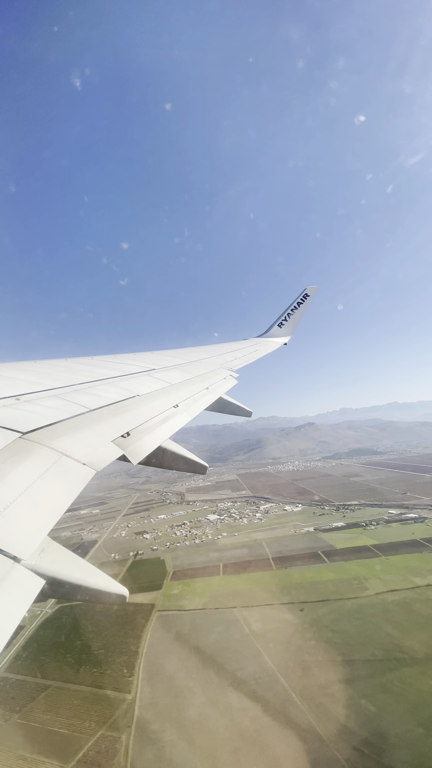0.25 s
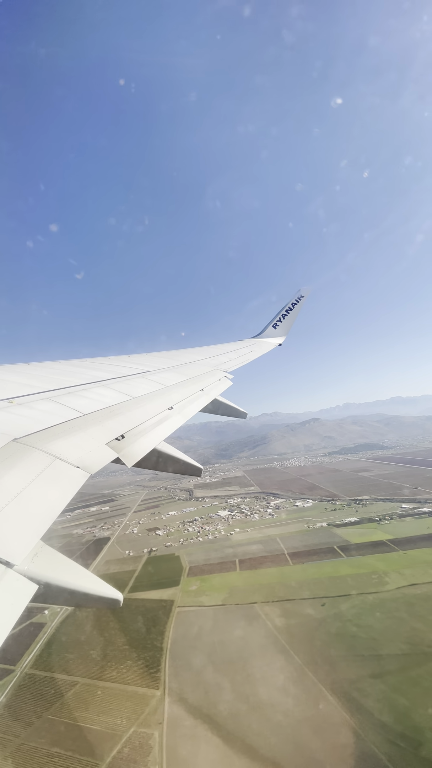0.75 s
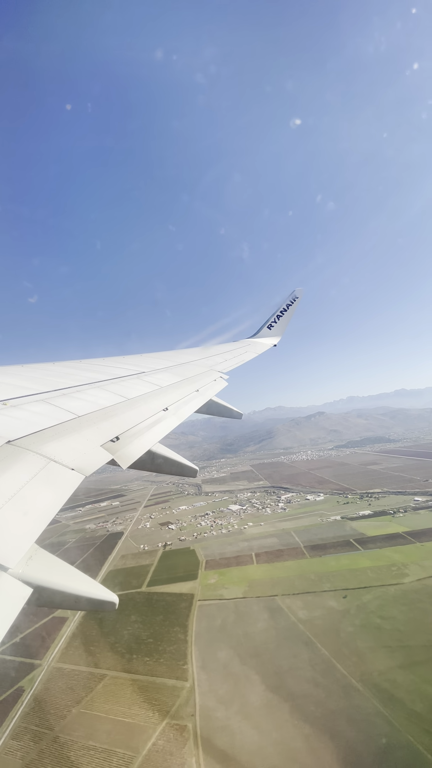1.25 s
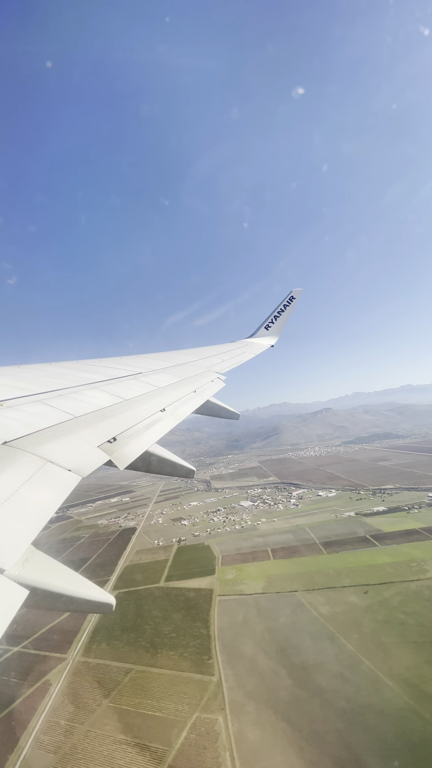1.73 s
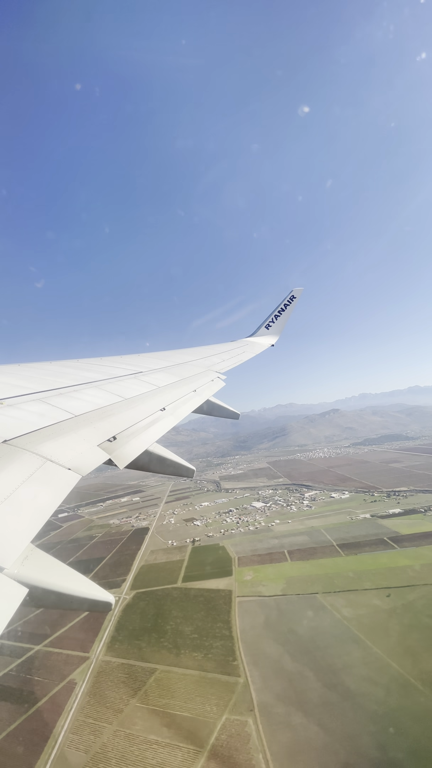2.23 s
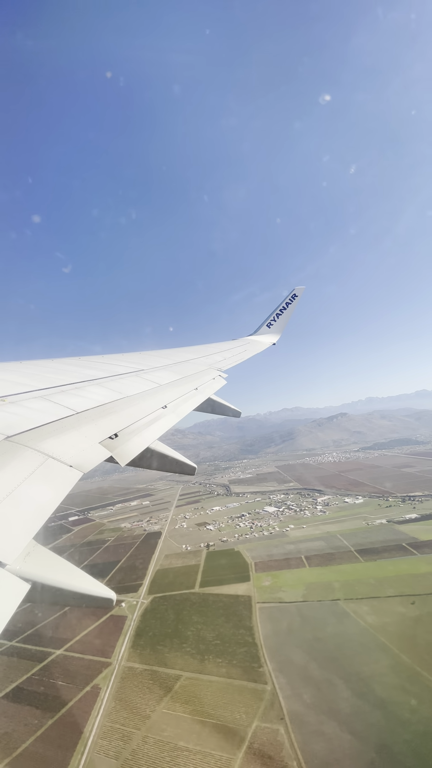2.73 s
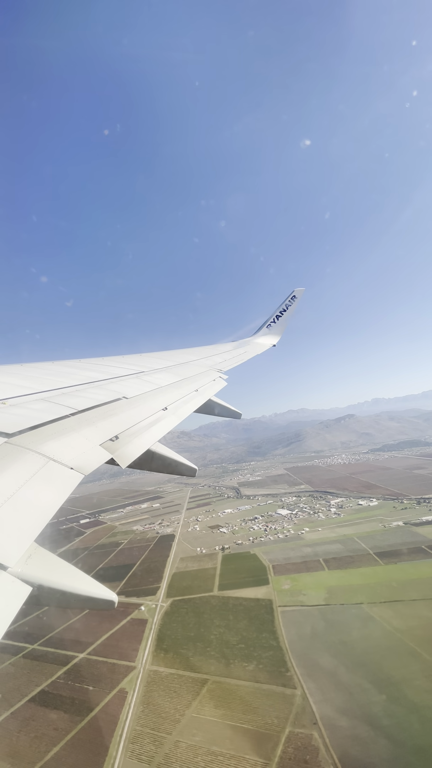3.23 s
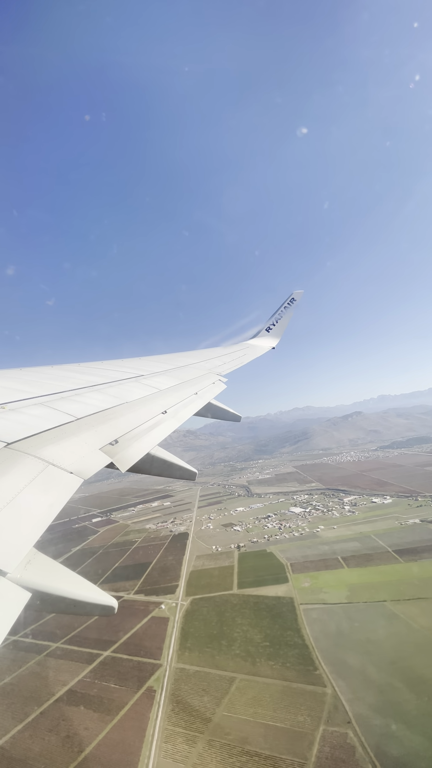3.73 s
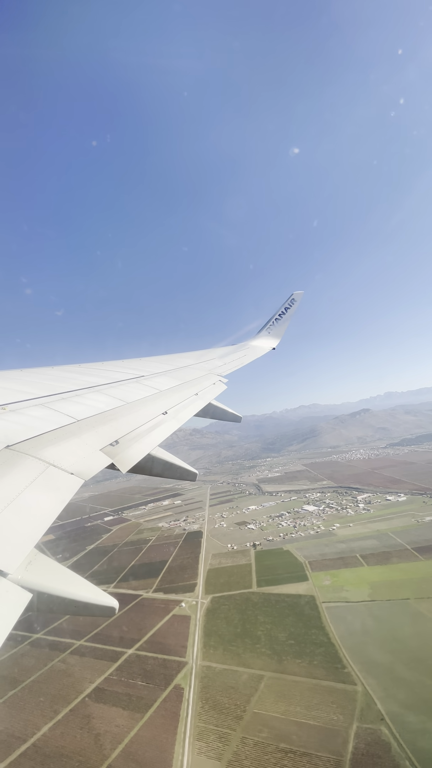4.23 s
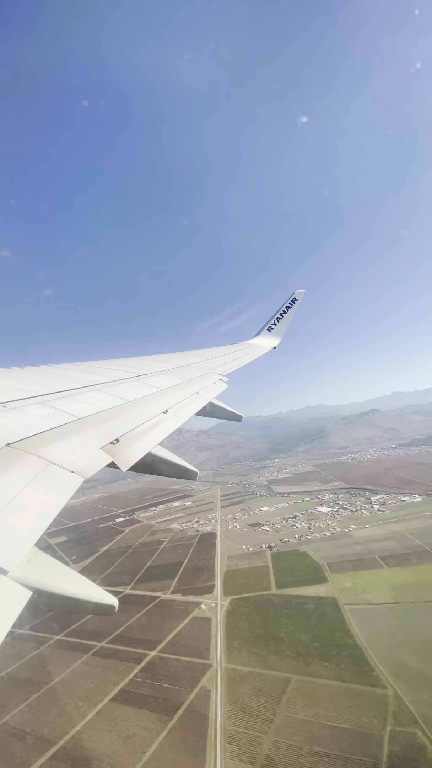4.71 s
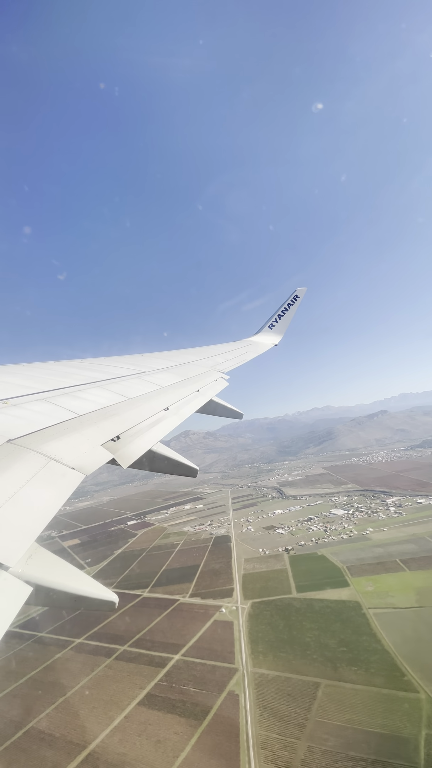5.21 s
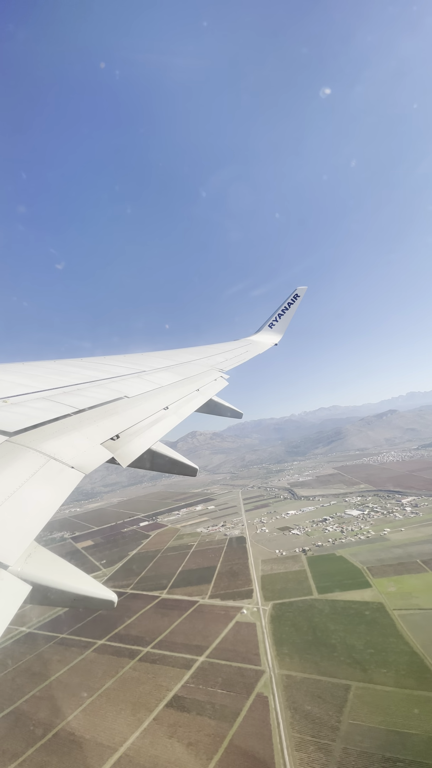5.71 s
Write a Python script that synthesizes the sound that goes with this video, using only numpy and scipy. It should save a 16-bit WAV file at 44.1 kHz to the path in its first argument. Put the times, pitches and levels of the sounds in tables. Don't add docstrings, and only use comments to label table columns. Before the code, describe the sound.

Continuous deep jet rumble heard from a window seat behind the wing, close and enclosed. Exhaust booms through the wall with a low pulsing shaft drone, and thin air hiss lies above. Small plastic trim ticks and short creaks scatter throughout, densest in the first few seconds. A very faint pump whine joins near the end. A handheld phone picks it all up in stereo, bass heavy and slightly compressed.

```python
import sys
import numpy as np
from scipy import signal
from scipy.fft import rfft, irfft, next_fast_len
from scipy.io import wavfile
from scipy.ndimage import uniform_filter1d, minimum_filter1d

SR = 44100
rng = np.random.default_rng(int(sys.argv[2]) if len(sys.argv) > 2 else 0)


def gain_from_db(level_db):
    decades = np.asarray(level_db, float) / 20
    return 10 ** decades


def inscribe(sig):
    pcm = np.round(np.clip(np.atleast_2d(sig).T, -1, 1) * 32767)
    wavfile.write(sys.argv[1], SR, pcm.astype(np.int16))


N = 262836
SIZE = next_fast_len(N)
HZ = np.maximum(np.arange(SIZE // 2 + 1) * SR / SIZE, 1)
TIME = np.arange(N) / SR


def over_hz(table):
    hz, *columns = np.transpose(table)
    return [np.interp(np.log(HZ), np.log(hz), column) for column in columns]


def shape(x, gain):
    return irfft(rfft(x, SIZE) * gain, SIZE)[..., :N]


def share(lo_hz, hi_hz):
    return 1 / (1 + (lo_hz / HZ) ** 6) - 1 / (1 + (hi_hz / HZ) ** 6)


def walk(rate):
    k = int(SR / rate)
    steps = np.repeat(rng.standard_normal(N // k + 1), k)
    return 1.388 * uniform_filter1d(uniform_filter1d(steps, k), k)[:N]


def swells(table):
    return sum(db * np.exp(-((TIME - s) / length) ** 2) for s, db, length in table)


# f/Hz, width/Hz, level/dB
PANE_RINGS = [(1077, 83, -50.5), (2093, 50, -63.5)]


def pane():
    noise = rng.standard_normal(N)
    out = 0
    for hz, width, db in PANE_RINGS:
        ring = shape(noise, 1 / np.sqrt(1 + (2 * (HZ - hz) / width) ** 4))
        out = out + gain_from_db(db) * ring / ring.std()
    return out


# t/s, f/Hz, level/dB
PUMP_WHINE = [
    (5.08, 1834, -60),
    (5.2, 1840, -59),
    (5.96, 1862, -61),
]


def pump():
    s, hz, db = np.transpose(PUMP_WHINE)
    start = np.clip((TIME - s[0]) / .03, 0, 1)
    phase = 2 * np.pi * np.cumsum(np.interp(TIME, s, hz)) / SR
    return np.sqrt(2) * start * gain_from_db(np.interp(TIME, s, db)) * np.sin(phase)


# f/Hz, level/dB
SQUEAK_NOTES = [(11000, -39), (8200, -50), (2200, -50)]


def squeak():
    middle_s, length_ms = .175, 7
    swell = np.exp(-((TIME - middle_s) * 1000 / length_ms) ** 2)
    return swell * sum(gain_from_db(db) * np.sin(2 * np.pi * hz * TIME) for hz, db in SQUEAK_NOTES)


# t/s, level/dB, dull part level/dB, bright part level/dB
TRIM_TICKS = [(0.0538, -64.5, -6, 11), (0.168, -63, 12, 18.5), (0.2101, -54, 13, 11),
              (0.2192, -53, 16, 17.5), (0.4448, -54, -4, 11.5), (0.5735, -53, 0, 5),
              (0.844, -39, -12, -8.5), (1.0428, -48, 0, 4.5), (1.0806, -54, 3, 0), (1.2367, -51, -12, 2),
              (1.3503, -52.5, 7, 6.5), (1.8203, -57.5, 4, 3.5), (1.8864, -42, 2, 2), (1.9752, -54, -1, 3),
              (2.0803, -47, 1, 5), (2.1272, -55.5, 2, 7), (2.2504, -55.5, 3, 5), (2.5237, -53, 2, 5),
              (2.6196, -45.5, -8, 0), (2.6526, -55, 1, 11.5), (2.9314, -46.5, -1, 5),
              (3.1505, -46.5, -2, 5), (3.1997, -53.5, 3, 0.5), (3.3473, -52.5, -5, 2.5),
              (3.8996, -43, -2, 1), (4.2398, -51.5, -12, -2.5), (5.0765, -49, -2, 7.5),
              (5.4244, -43, -7, 4), (5.6317, -50, -6, 11)]
# start t/s, length t/s, level/dB, slip rate f/Hz, bright part level/dB
TRIM_CREAKS = [
    (0.181, .03, -63.5, 130, 15.5),
    (0.226, .03, -62.5, 110, 10),
    (0.465, .075, -56.5, 68, 5),
    (0.734, .025, -52, 65, 3.5),
    (1.4164, .035, -53, 40, -1),
    (1.563, .042, -50, 65, -4.5),
    (3.731, .055, -53, 39, 0.5),
    (4.011, .025, -52, 60, -5),
    (4.113, .037, -54, 95, 2),
    (4.35, .052, -51.5, 86, 0.5),
]
# f/Hz, level/dB
TRIM_COLOUR = [(1300, -22), (2000, 4), (3400, -2), (4800, -5.5), (5350, 0), (5900, -5), (6600, -3.5),
               (8100, 2.5), (9300, -0.5), (10800, 7.5), (12000, -10.5), (13500, -22)]


def trim_slips():
    rows = list(TRIM_TICKS)
    for at, u in rng.random((160, 2)):
        rows.append((at * N / SR, -64 - 5 * np.log10(u + .01), -3, -2.5))
    scatters = rng.standard_normal((len(TRIM_CREAKS), 12))
    for (start, length, db, rate, bright_db), scatter in zip(TRIM_CREAKS, scatters):
        for s, z in zip(np.arange(start, start + length, 1 / rate), scatter):
            rows.append((s, db + z, -3, bright_db))
    return rows


def trim():
    slip_ms, rise_ms, ring_ms = 4.54, 0.29, 26
    ms = np.arange(3000) / SR * 1000
    power = np.zeros((3, N + len(ms)))
    for s, db, dull_db, bright_db in trim_slips():
        ring_db = -10 - 0.28 * (db + 54.5)
        ring = gain_from_db(ring_db) * np.exp(-ms / ring_ms)
        burst = (1 - np.exp(-ms / rise_ms)) * (np.exp(-(ms / slip_ms) ** 4) + 1.66 * ring)
        band_db = db + np.array([[dull_db], [0], [bright_db]])
        i = int(s * SR)
        power[:, i:i + len(ms)] += (gain_from_db(band_db) * burst) ** 2

    jumps = gain_from_db(0.99 * rng.standard_normal(N // 20 + 1).repeat(20)[:N])
    grit = shape(rng.standard_normal((2, N)) * jumps, gain_from_db(over_hz(TRIM_COLOUR)[0]))
    edges = [0, 4100, 7000, SR * 20]
    out = 0
    for lo, hi, p in zip(edges, edges[1:], power):
        band = shape(grit, share(lo, hi))
        even = band / np.sqrt(uniform_filter1d(band ** 2, size=130, axis=1))
        out = out + even * np.sqrt(p[:N])
    return shape(out, share(1100, 12000))


ENGINE_HZ = [74.2, 1049, 1482.6, 2056, 4230.6]
# level/dB, pitch wander f/Hz, wander level/dB, left minus right level/dB, right leads phase/rad
ENGINE_TONES = [
    (-19.5, 0.61, 1.6, -1.2, 0.07),
    (-53.5, 1.5, -1, -4.5, 0.27),
    (-59.5, 2.2, 3.5, 6, -1.8),
    (-68.5, 2.5, 3, -1, 1.6),
    (-66.5, 0.24, -0.5, -2, -1.3),
]
# t/s, lift level/dB, length t/s
SHAFT_BEATS = [
    (0.22, -2.5, .15),
    (0.65, 6.5, 0.82),
    (3.18, 7, 0.52),
    (4.02, 5.5, 0.079),
    (4.9, 2.5, 0.67),
]
# t/s, lift level/dB, length t/s
GEAR_BEATS = [
    (0.55, 3, .25),
    (2.0, 0, .2),
    (2.78, 6, .15),
    (3.8, 6.5, .4),
    (4.39, -6.5, .1),
    (4.65, 2.5, .2),
]
# t/s, lift level/dB, length t/s
BLADE_BEATS = [
    (0.28, -14, 0.11),
    (2.45, 4.5, 0.23),
    (4.0, 9.5, 0.21),
]


def tones():
    beats = [swells(SHAFT_BEATS) - 2, swells(GEAR_BEATS) - 2, swells(BLADE_BEATS) - 1, 0, 0]
    side = np.array([[1], [-1]]) / 2
    out = 0
    for hz, tone, beat_db in zip(ENGINE_HZ, ENGINE_TONES, beats):
        db, wander_hz, wander_db, pan_db, lead = tone
        phase = 2 * np.pi * np.cumsum(hz + wander_hz * walk(5.4)) / SR
        level_db = db + beat_db + wander_db * walk(5.93)
        out = out + np.sqrt(2) * gain_from_db(level_db + pan_db * side) * np.sin(phase - lead * side)
    return out


# f/Hz, level/dB (per Hz)
EXHAUST = [(20, -58), (38, -43), (52, -35), (64, -35), (88, -36.5), (135, -34), (165, -34.5), (225, -35.5),
           (250, -45.5), (330, -42), (375, -51.5), (410, -48), (460, -58.5), (560, -61.5)]
# f/Hz, level/dB (per Hz)
RUSHING_AIR = [(560, -62.5), (750, -61), (1000, -70), (1400, -70.5), (1800, -82), (2150, -80), (2900, -83),
               (3600, -90), (5000, -93.5), (7000, -94), (8300, -96.5), (9700, -95.5), (11000, -97.5),
               (12300, -107.3)]
# f/Hz, width/Hz, lift level/dB
CABIN_BOOMS = [(111, 13, 9), (196.6, 7.4, -1.5), (235, 33, 2), (5160, 120, 4), (10600, 270, 2)]
# t/s, drone level/dB, length t/s
EXHAUST_BUFFETS = [(0.32, 6, 0.16), (1.38, -5.5, 0.26), (1.58, 8, 0.041), (2.07, 3, 0.063),
                   (2.36, 7, 0.067), (2.82, 9, 0.13), (3.22, -2.5, 0.047), (4.6, 0.5, 0.5),
                   (4.89, -11, 0.098), (5.15, 0.5, 0.09), (5.57, 8.5, .06), (5.7, -9.5, 0.095),
                   (5.82, 10, 0.04)]
CLIMB = [0.24, 0.11, .3, 0.28, 0.071]
FLICKER = [1.5, 1.5, .6, .4, .5]


def rush():
    db = np.where(HZ < EXHAUST[-1][0], over_hz(EXHAUST)[0], over_hz(RUSHING_AIR)[0])
    db = db - 60 * np.log2(np.maximum(HZ / RUSHING_AIR[-1][0], 1))
    db = db - 30 * np.log2(np.maximum(EXHAUST[0][0] / HZ, 1))
    for hz, width, lift_db in CABIN_BOOMS:
        db = db + lift_db / (1 + (2 * (HZ - hz) / width) ** 2)
    field = rfft(rng.standard_normal((2, SIZE))) * gain_from_db(db) * np.sqrt(SR / 2)

    buffet_db = swells(EXHAUST_BUFFETS)
    buffet_shares = [-0.3, 1, -0.06, 0, 0]
    edges = [0, 97, 128, 480, 2800, SR * 20]
    out = 0
    for lo, hi, part, climb, flicker_db in zip(edges, edges[1:], buffet_shares, CLIMB, FLICKER):
        swell_db = part * buffet_db + climb * (TIME - TIME.mean()) + flicker_db * walk(9)
        out = out + gain_from_db(swell_db) * irfft(field * share(lo, hi), SIZE)[:, :N]
    return out


# f/Hz, likeness (0-1), right leads phase/rad, left minus right level/dB
MIC_PORTS = [(255, .992, .1, -1.5), (440, .72, 1.05, -2), (520, .1, .3, .1), (650, .68, -2.2, -3),
             (1400, .75, -2.6, .5), (1950, .15, -2.9, 3), (2900, .72, -3.2, .1), (3800, .25, -3.4, -.5),
             (4600, .25, -9.4, -1.5), (5700, .5, -12.6, -1.5), (7000, .25, -15.6, -1.5),
             (8900, .6, -14.9, -2.5), (9900, .98, -5 * np.pi, -.2), (11750, .99, -6 * np.pi, 0)]


def ports(fields):
    like, lead, pan_db = over_hz(MIC_PORTS)
    like = np.clip(like, 0, 1)
    tilt = gain_from_db(pan_db / 2)
    left = shape(fields[0], tilt)
    shared = shape(fields[0], like * np.exp(1j * lead) / tilt)
    own = shape(fields[1], np.sqrt(1 - like ** 2) / tilt)
    return np.array([left, shared + own])


def scene():
    fade = np.clip(TIME / .004, 0, 1) ** 2
    around = rush() * gain_from_db(1.0) + trim() * gain_from_db(-1.0) + squeak()
    return ports(fade * around) + fade * (tones() + pane() + pump())


def top_cut(x):
    return signal.sosfilt(signal.butter(12, 14800, fs=SR, output="sos"), x)


def record(dry):
    limit, hold_ms = 0.89, 8.6
    hold = int(hold_ms * SR / 1000)
    need = np.minimum(limit / (np.abs(dry).max(axis=0) + 1e-9), 1)
    gain = uniform_filter1d(uniform_filter1d(minimum_filter1d(need, 2 * hold), hold), hold)
    bass = shape(dry, share(0, 450))
    limited = dry - bass + bass * gain
    low_cut = 1 / np.sqrt(1 + (31 / HZ) ** 4)
    high_step = .4 + .6 / (1 + (HZ / 12480) ** 200)
    return top_cut(shape(limited, high_step * low_cut))


dry = scene()
out = record(dry)
inscribe(out)
```